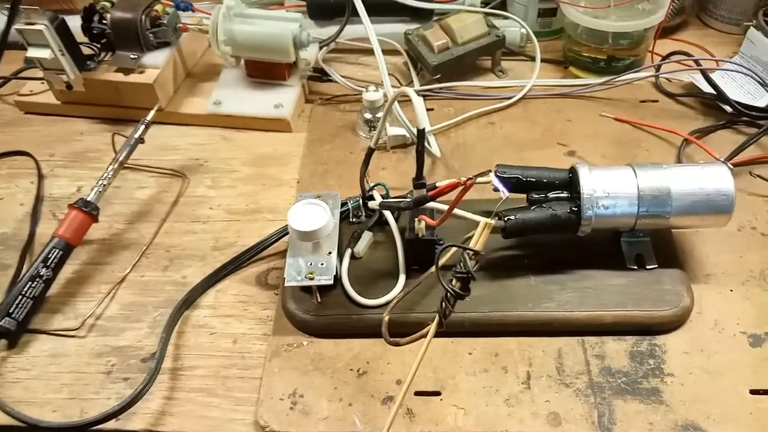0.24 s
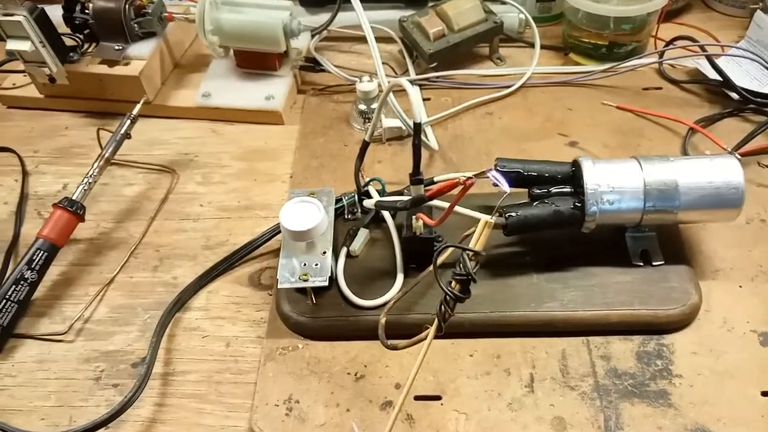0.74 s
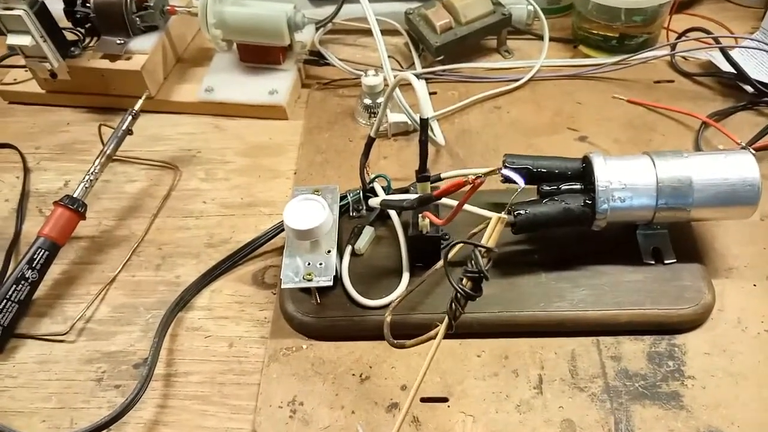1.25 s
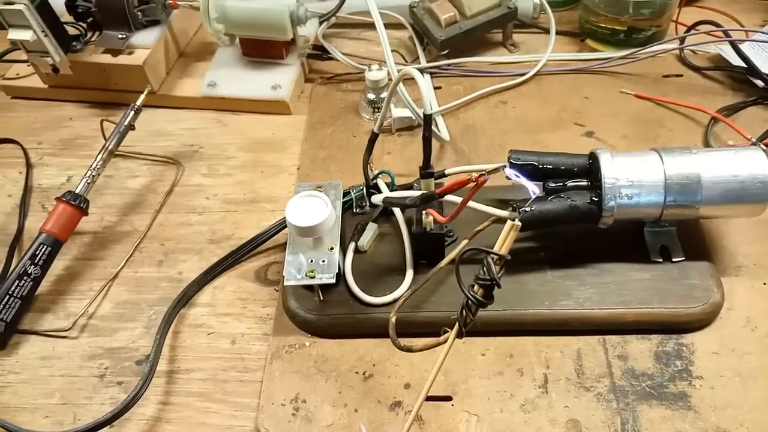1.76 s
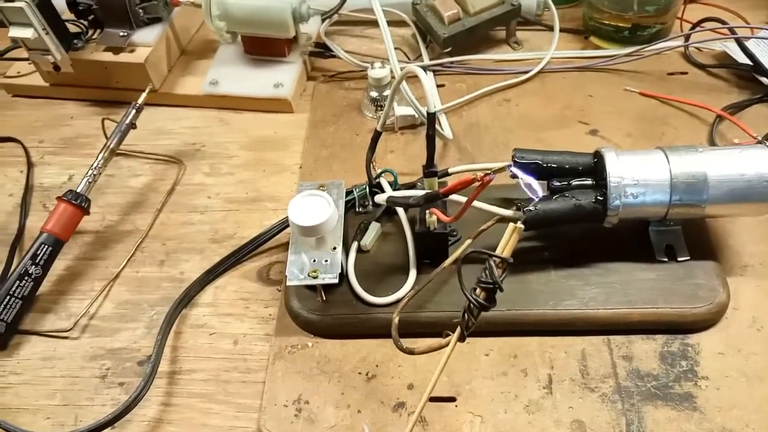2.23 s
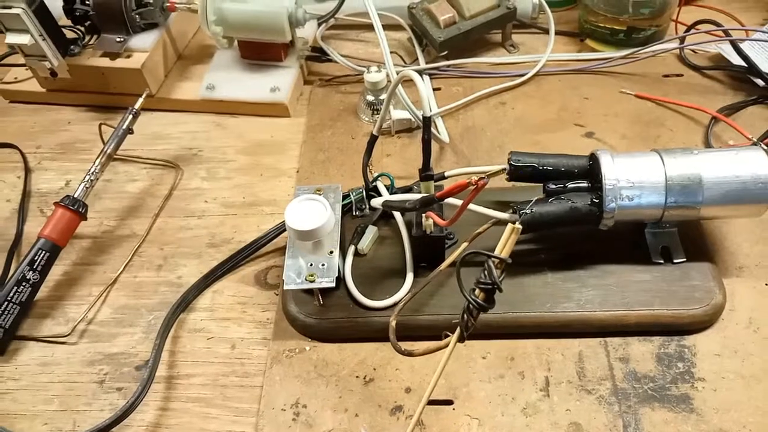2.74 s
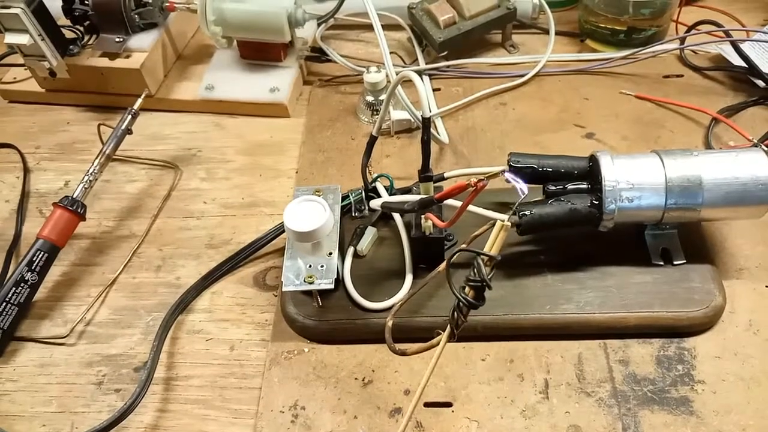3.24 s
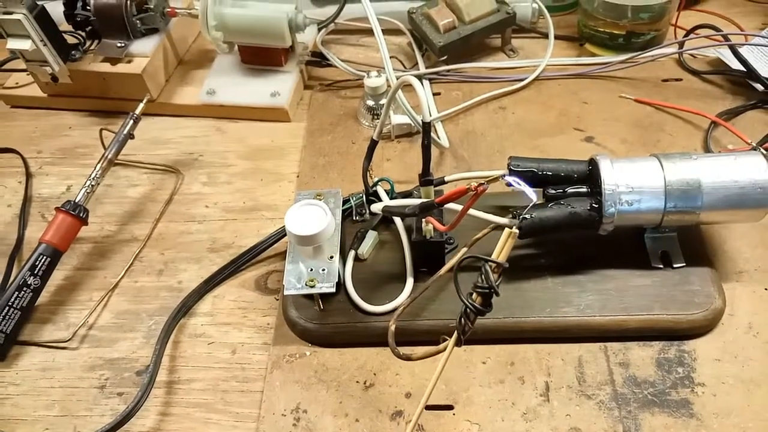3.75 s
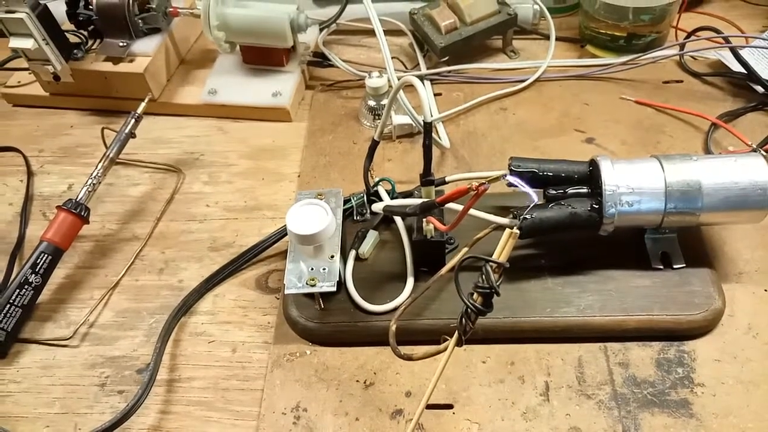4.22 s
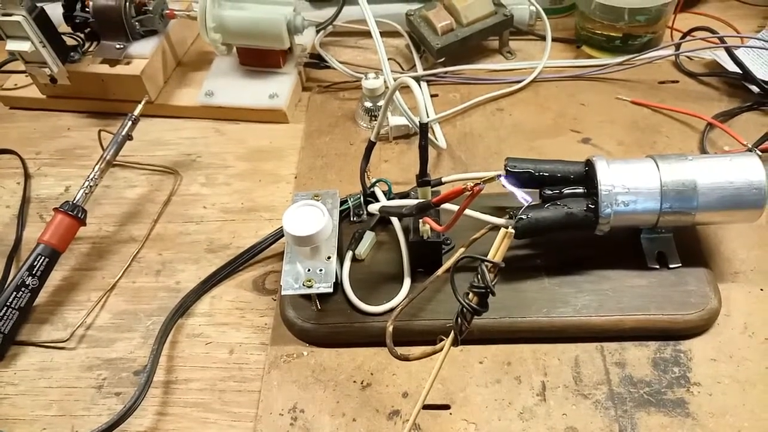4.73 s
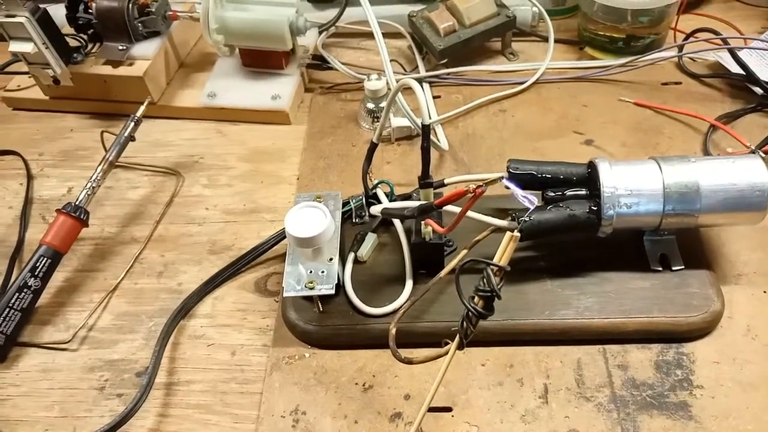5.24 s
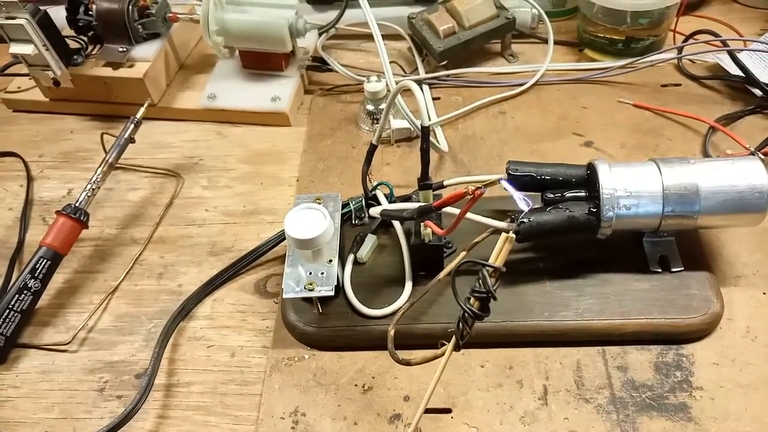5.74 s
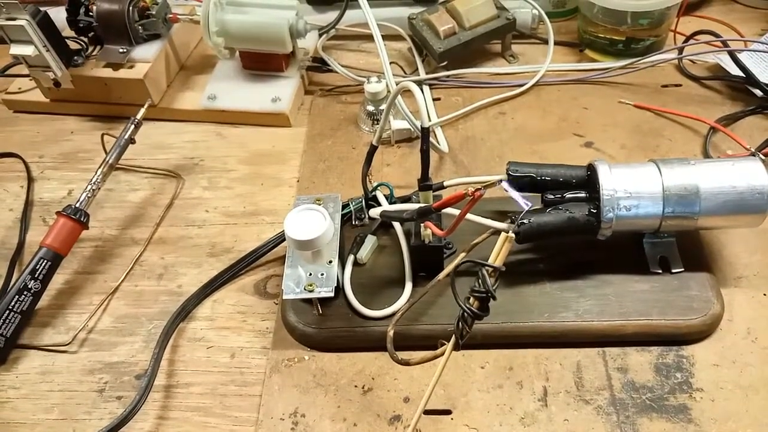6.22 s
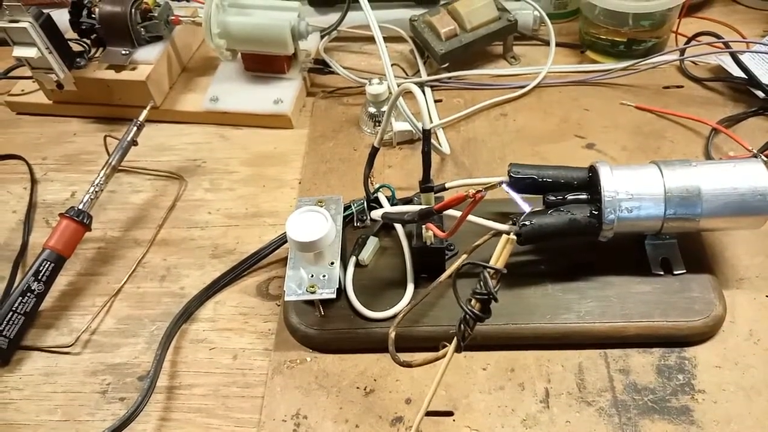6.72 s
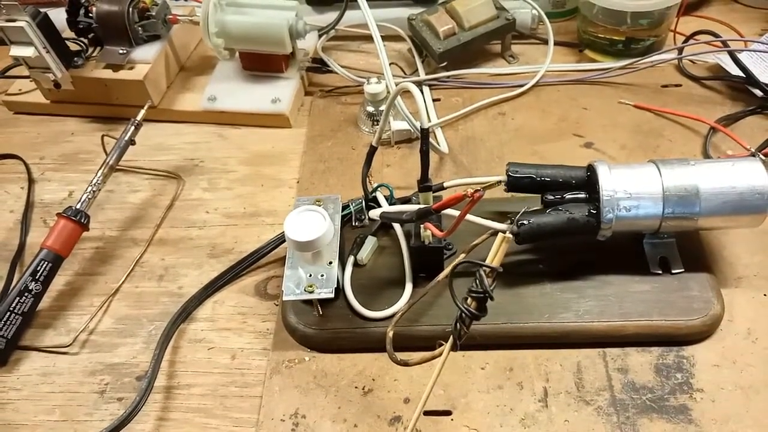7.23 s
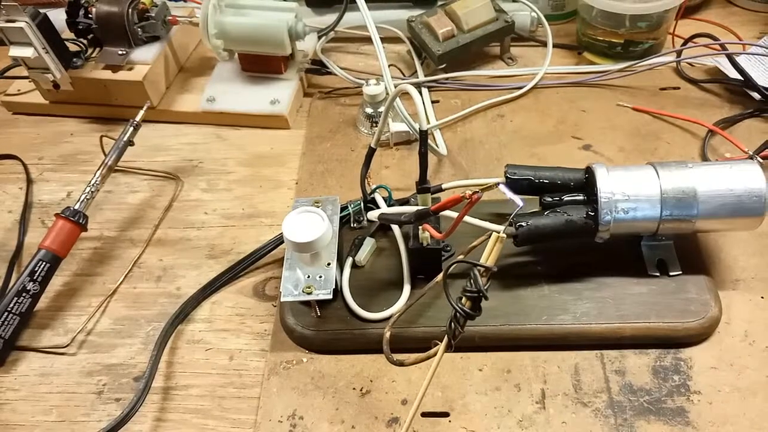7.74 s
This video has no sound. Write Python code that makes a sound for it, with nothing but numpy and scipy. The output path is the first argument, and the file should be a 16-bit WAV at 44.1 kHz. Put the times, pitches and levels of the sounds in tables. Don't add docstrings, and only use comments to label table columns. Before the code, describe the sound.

Close to the microphone on a wooden bench, an electric spark gap crackles at about 120 snaps a second, a harsh dry buzz. It cuts out and re-strikes repeatedly, with single sharp snaps in the gaps and dull little thumps under some sparks. A longer lull near the middle leaves faint ticks and hiss, then the buzz returns steady before breaking into ragged stutters. Short, small-room reflections.

```python
import sys
import numpy as np
from scipy import signal
from scipy.fft import rfft, irfft, next_fast_len
from scipy.io import wavfile
from scipy.ndimage import uniform_filter1d

SR = 44100
rng = np.random.default_rng(int(sys.argv[2]) if len(sys.argv) > 2 else 0)


def waveform_to_disk(signal):
    frames = np.transpose(np.atleast_2d(signal))
    scaled = np.clip(frames, -1, 1) * 32767
    samples = np.round(scaled).astype(np.int16)
    wavfile.write(sys.argv[1], SR, samples)


def gain_from_decibels(decibels):
    exponent = np.asarray(decibels, float) / 20
    return 10 ** exponent


N = 351477

# time in seconds, step in dB.
DUMPS = [(1.52, -40), (1.6675, -30), (1.8012, -31), (1.8754, -28), (2.1843, -35), (2.242, -31),
         (2.5738, -26), (2.6088, -30), (3.7256, -39), (3.7905, -37.5), (3.826, -35), (4.2256, -25.5),
         (4.5162, -32), (4.5513, -27), (4.769, -29), (5.0092, -25), (5.15, -36.5), (5.2164, -34),
         (5.2736, -27), (5.5403, -35), (5.5576, -35.5), (5.7155, -35), (5.775, -30.5), (5.8515, -37.5),
         (6.0417, -27), (6.407, -39), (6.5008, -36), (6.8513, -36.5), (7.0063, -35.5), (7.173, -40.5)]
# time in seconds, step in dB.
RETURNS = [(1.8083, -38.5), (3.8319, -38), (3.9353, -35.5), (4.2344, -31.5), (4.276, -39.5), (4.5344, -35),
           (4.5845, -39), (4.6511, -42), (4.8344, -40.5), (5.0175, -31), (5.1827, -38.5), (5.2343, -33.5),
           (5.3081, -36), (5.8018, -34.5), (6.053, -38), (6.435, -37.5)]


def colour(x, points):
    hz, db = np.transpose(points)
    grid = np.maximum(np.fft.rfftfreq(2048, 1 / SR), 1)
    log_gain = np.log(gain_from_decibels(np.interp(np.log(grid), np.log(hz), db)))
    cepstrum = irfft(log_gain)
    half = len(cepstrum) // 2
    cepstrum[1:half] *= 2
    cepstrum[half + 1:] = 0
    response = irfft(np.exp(rfft(cepstrum)))
    return signal.fftconvolve(x, response)[:len(x)]


def clicks(s, size):
    place = np.clip(np.round(s * SR).astype(int), 0, N - 1)
    return np.bincount(place, size, N)


def fade(t, t60_s):
    return np.exp(-np.log(1000) * t / t60_s)


def ring(x, hz, width_hz):
    return signal.lfilter(*signal.iirpeak(hz, hz / width_hz, SR), x)


def sparks(crack_db=0.5, stretch_db=-1.0):
    # breakdown in seconds into the cycle, shift in seconds when stretched,
    # jitter in seconds, crack in dB, fullest spike in dB.
    halves = [
        (.0014, .0015, .00013, -24.5, -24),
        (.0084, -.0011, .00008, -26, -22),
    ]
    # time in seconds, delay in ms.
    gap = [(.25, .1), (.6, -.1), (.8, .2), (1.0, .1), (1.1, .4), (1.4, .2), (1.6, -.3), (2.2, -.3),
           (3.05, .1), (3.25, -.15), (3.45, 0), (3.7, -.4), (4.6, -.2), (5.1, -.4), (6.2, -.3), (6.8, -.4),
           (7.4, -.1), (7.95, -.2)]
    # start in seconds, stop in seconds, stretch of the arc 0-1, current in dB.
    arcs = [(0, .028, 0.77, -2.5), (.213, .612, 0, 0.5), (.755, 1.005, 0, 1), (1.005, 1.48, 0, 1),
            (1.48, 1.562, 0.74, 0), (1.638, 1.88, 0.02, -1), (1.897, 1.93, .9, 0), (1.988, 2.188, 0, -0.5),
            (2.188, 2.312, 0.5, -1), (3.055, 3.58, 0, 0.66), (3.58, 3.788, 0, -1),
            (3.788, 3.896, 0.4, -1.5), (3.922, 4.03, 0.04, -1.5), (4.03, 4.072, 0.68, -1),
            (4.08, 4.238, 0, -0.5), (4.255, 4.305, 0.04, 0.5), (4.305, 4.43, 0.84, -1),
            (4.522, 4.738, 0.01, -0.5), (4.738, 4.805, 1, 0), (4.805, 5.022, 0.05, -1),
            (5.055, 5.105, 0.02, -1), (5.172, 5.28, 0.62, -0.5), (5.422, 5.462, 0.2, 0),
            (5.722, 5.888, 0.13, -0.5), (5.888, 6.03, 0.68, -1), (6.038, 6.438, 0, -0.5),
            (6.472, 6.538, 0, -2), (6.538, 6.755, 0.84, -1), (6.755, 6.862, 0.04, -1.5),
            (7.338, 7.962, 0.03, -0.5)]
    misses = [.018, 1.675, 2.201, 2.218, 2.284, 2.301, 3.108, 3.392, 3.801, 3.818, 3.884, 3.958, 4.268,
              4.558, 4.775, 4.958, 4.984, 5.001, 5.201, 5.268, 5.451, 5.951, 5.968, 6.192, 6.208, 6.258,
              6.401, 6.418, 6.608, 7.5552]
    # time in seconds, crack in dB, induced spike in dB.
    restrikes = [(0.2077, -23.5, -35.5), (0.7413, -20, -26), (.7499, -29, -26.5), (1.5902, -24.5, -23),
                 (1.6266, -24, -26.5), (1.6317, -22, -25), (1.943, -23, -25), (1.9736, -22.5, -22.5),
                 (2.5738, -23, -26.5), (2.5904, -26, -32), (2.6088, -22, -28), (2.9156, -45, -32),
                 (2.9244, -19, -32), (3.0403, -20.5, -19.5), (4.2406, -49, -27), (4.4899, -25.5, -27),
                 (4.5162, -25.5, -26), (5.1235, -23, -26), (5.15, -20, -27), (5.3081, -22, -22.5),
                 (5.4069, -24.5, -23.5), (5.493, -20.5, -23.5), (5.501, -27, -27), (5.5402, -22, -28),
                 (5.5583, -21.5, -29), (5.7155, -22, -28), (6.457, -20.5, -28), (7.0064, -20, -28.5),
                 (7.173, -24.5, -24.5), (7.3224, -22, -28.5)]
    # time in seconds, crack in dB.
    cold_snaps = [(.075, -22), (.141, -22.5), (2.7582, -23), (2.8663, -23), (4.457, -31), (5.398, -35),
                  (4.485, -37), (5.6003, -28), (5.6403, -25), (5.651, -27), (5.6695, -28), (5.676, -40),
                  (5.689, -44), (6.9, -28), (6.9739, -23), (6.9847, -29), (7.0513, -25), (7.132, -25.5),
                  (7.2398, -22.5), (7.29, -23), (7.3162, -45)]
    mains_hz, mains_slip = 60, .00005
    stretch_jitter_s = .0005
    crack_per_current = -1.1
    sag_db = 2.4

    cycle = np.arange(int(N / SR * mains_hz) + 1)[:, None] / mains_hz
    at, shift, jitter, crack_level, spike_level = (np.ravel(v + 0 * cycle) for v in np.transpose(halves))
    s = (at + np.repeat(cycle, 2)) * (1 + mains_slip)
    s[::2] += np.interp(s[::2], *np.transpose(gap)) / 1000

    start, stop, stretch, current_db = np.transpose(arcs)
    k = np.searchsorted(start, s) - 1
    missed = np.abs(s[:, None] - misses).min(axis=1) <= .004
    lit = (s < stop[k]) & ~missed
    far = np.clip(stretch[k], 0, 1)
    chance = rng.standard_normal((len(s), 3)).T
    strike_s = s + far * shift + (jitter + stretch_jitter_s * far) * chance[0]
    crack_level = crack_level + crack_per_current * current_db[k] + (crack_db + stretch_db * far) * chance[1]
    spike_level = spike_level + current_db[k] - sag_db * np.abs(chance[2])
    arc_rows = np.array([strike_s, crack_level, spike_level]).T

    snap_rows = [(t, db, db - 25) for t, db in cold_snaps]
    rows = np.vstack([arc_rows[lit], restrikes, snap_rows]).T
    jump_s = np.transpose(DUMPS + RETURNS)[0]
    rows[0, np.abs(rows[0][:, None] - jump_s).argmin(axis=0)] = jump_s
    return rows


def room(count, early_db, early_t60, late_db, late_t60, wander):
    # delay in seconds, level in dB.
    echoes = [(.0009, -20), (.0028, 3.5), (.0043, -5), (.0058, 1)]
    t = np.arange(SR // 2) / SR
    noise = rng.standard_normal(len(t)) + wander * rng.standard_normal((count, len(t)))
    near = gain_from_decibels(-12.5) * fade(t, 0.0046)
    early = gain_from_decibels(early_db) * fade(t, early_t60)
    late = gain_from_decibels(late_db) * fade(t, late_t60)
    out = noise * (near + early + late)
    out[:, 0] = -1
    for s, db in echoes:
        out[:, int(s * SR)] -= gain_from_decibels(db)
    spectrum = rfft(out)
    broad = uniform_filter1d(np.mean(np.abs(spectrum) ** 2, axis=0), size=110)
    return irfft(spectrum * np.sqrt(broad.mean() / broad))[:, :len(t) * 3 // 4]


def through(s, size, paths):
    pick = (2 * s + 2 * rng.random(len(s))).astype(int) % len(paths)
    return sum(signal.fftconvolve(clicks(s, size * (pick == k)), p)[:N] for k, p in enumerate(paths))


def crack(s, db, spike_db):
    # frequency in Hz, gain in dB.
    bench_ring = [(900, -34.5), (2100, -21), (3300, -26.5), (4700, -17.5), (5700, -14.5), (6800, -10),
                  (7600, -14), (8200, -24), (11000, -27.5)]
    # frequency in Hz, gain in dB.
    heat = [(400, -17), (1500, -21), (2200, -15), (3400, -20.5), (8300, -21.5), (9100, -9.5),
            (10300, -10.5), (11800, -21), (13800, -18), (14900, -4.5), (15600, -6.5)]
    hot = np.clip((spike_db + 37.0) / 14, .08, 1)
    push = clicks(s, gain_from_decibels(db) * (1.07 * hot - 1))
    snap = signal.sosfiltfilt(signal.butter(1, 4200, "high", fs=SR, output="sos"), push)
    body_paths = room(count=6, early_db=-17, early_t60=0.051, late_db=-28.5, late_t60=0.28, wander=.6)
    body = through(s, gain_from_decibels(db), body_paths)
    fizz_paths = room(count=6, early_db=-20, early_t60=.03, late_db=-30, late_t60=.28, wander=.9)
    fizz = through(s, -gain_from_decibels(db) * hot, fizz_paths)
    return gain_from_decibels(13.0) * snap + gain_from_decibels(23.5) * colour(body, bench_ring) + gain_from_decibels(20.5) * colour(fizz, heat)


def pickup(s, crack_db, db, stray_db=-33):
    leaks = [.268, .568, .785, 0.919, 1.503, 2, 2.034, 4.053, 4.99, 5.059, 5.405, 6.185, 7.342]
    leak_db = -44
    size = np.sqrt(np.maximum(gain_from_decibels(2 * db) - gain_from_decibels(2 * (crack_db - 17)), 0))
    spike = signal.lfilter([1], [1, -.74], clicks(s, size))
    spike = spike - 0.28 * signal.lfilter([.035], [1, -.965], spike)

    dump_s, dump_db = np.transpose(DUMPS)
    return_s, return_db = np.transpose(RETURNS)
    jumps = clicks(dump_s, gain_from_decibels(dump_db)) - clicks(return_s, gain_from_decibels(return_db))
    jumps = jumps + gain_from_decibels(leak_db) * clicks(np.array(leaks), None)
    jumps = jumps + clicks(s, size * gain_from_decibels(stray_db) * rng.standard_normal(len(s)))
    steps = uniform_filter1d(np.cumsum(jumps), size=17, origin=5)
    return gain_from_decibels(9.5) * spike + gain_from_decibels(16.5) * steps


def shop(level_db=-57):
    # frequency in Hz, density in dB per Hz.
    hiss_tone = [(40, 10.5), (124, -12.5), (700, -24.5), (1800, -14), (3000, -16.5), (3740, -15),
                 (4400, -7.5), (7600, -10), (8400, -32), (10000, -29), (13600, -39), (15000, -4)]
    hiss = colour(rng.standard_normal(N), hiss_tone)
    whine = sum(ring(rng.standard_normal(N), hz, width_hz=45) for hz in (1195, 1865, 2440, 3050))
    return gain_from_decibels(level_db) * (hiss / hiss.std() + gain_from_decibels(3) * whine)


def corona(level_db=-51):
    tick_s = [.674, .7, .717, 2.383, 2.44, 2.45, 2.467, 2.491, 2.501, 2.524, 2.533, 2.551, 2.691, 2.701,
              2.726, 2.742, 2.775, 2.792, 2.809, 2.825, 7.091, 7.102]
    t = np.arange(SR // 20) / SR
    ticks = clicks(np.array(tick_s), gain_from_decibels(level_db + 2.1 * rng.standard_normal(len(tick_s))))
    bursts = signal.fftconvolve(ticks, rng.standard_normal(len(t)) * fade(t, 0.019))[:N]
    return ring(ring(bursts, 8500, 4500), 8500, 4500)


def suppressor():
    # time in seconds, gain in dB.
    gate = [
        (2.39, 13.5),
        (2.42, -3),
        (2.434, -6),
        (2.437, 8.5),
    ]
    return gain_from_decibels(np.interp(np.arange(N) / SR, *np.transpose(gate)))


def scene():
    s, crack_db, spike_db = sparks()
    background = suppressor() * (shop() + corona())
    mix = crack(s, crack_db, spike_db) + pickup(s, crack_db, spike_db) + background
    return mix[None]


def roll_off(x):
    return signal.sosfilt(signal.butter(12, 17130, fs=SR, output="sos"), x)


def record(dry):
    dry = dry - 0.37 * ring(dry, 8170, width_hz=380)
    low_cut = [signal.butter(2, hz, "high", fs=SR, output="sos") for hz in (95, 50)]
    size = next_fast_len(N)
    spectrum = rfft(signal.sosfilt(np.vstack(low_cut), dry), size)
    spectrum *= np.clip((15860 - np.fft.rfftfreq(size, 1 / SR)) / 120, 0, 1)
    return roll_off(irfft(spectrum, size)[:, :N])


dry = scene()
out = record(dry)
waveform_to_disk(out)
```